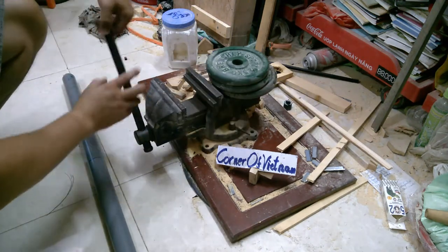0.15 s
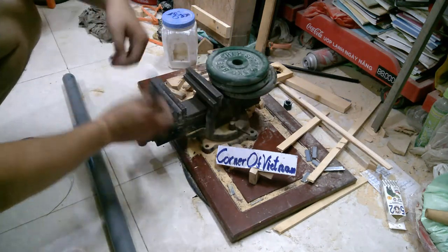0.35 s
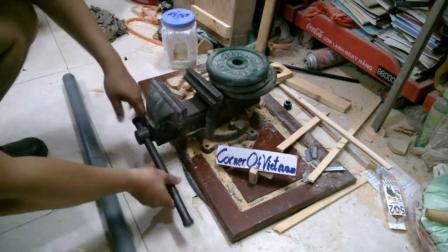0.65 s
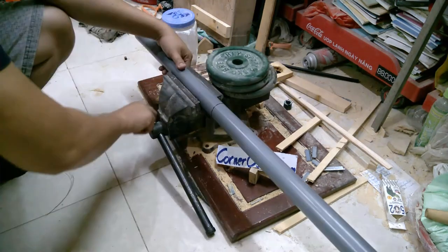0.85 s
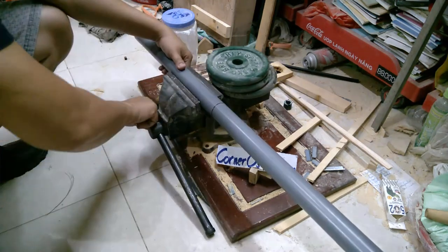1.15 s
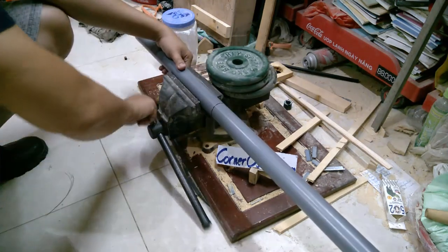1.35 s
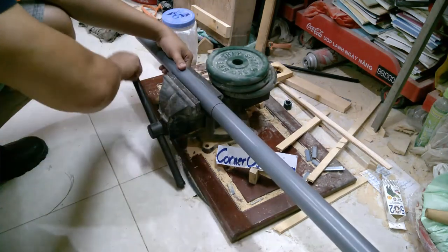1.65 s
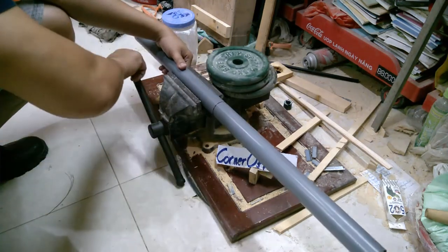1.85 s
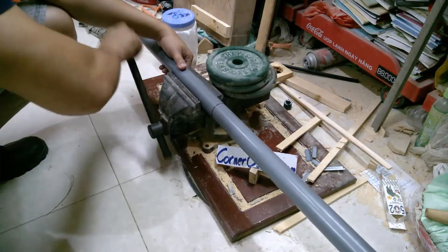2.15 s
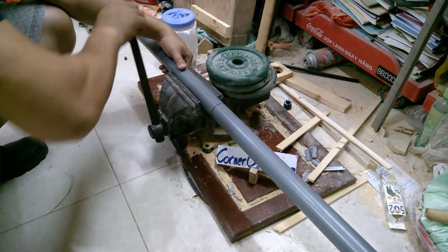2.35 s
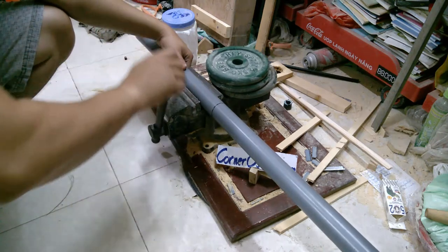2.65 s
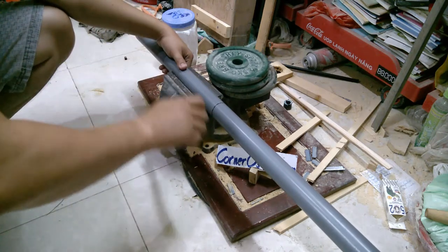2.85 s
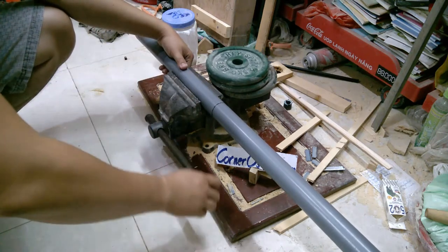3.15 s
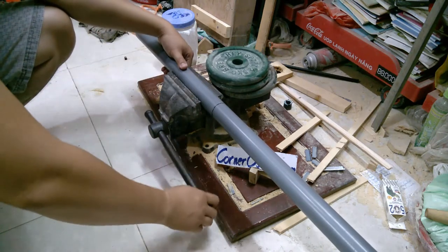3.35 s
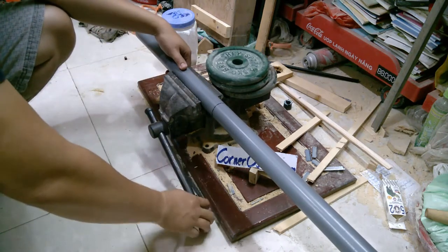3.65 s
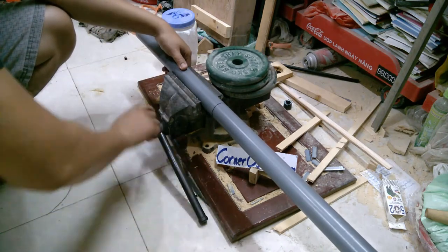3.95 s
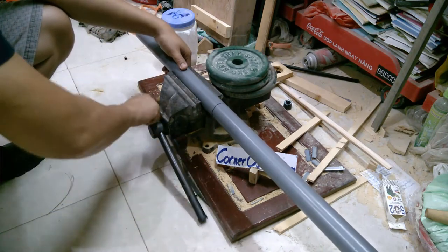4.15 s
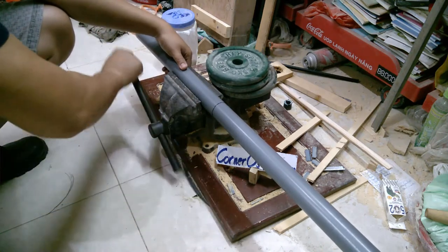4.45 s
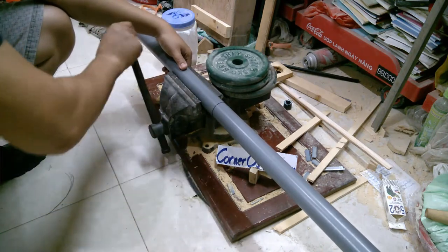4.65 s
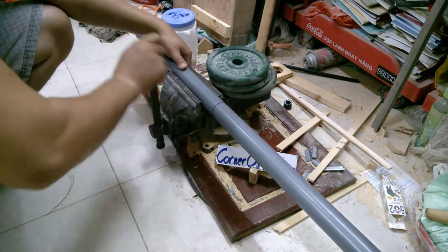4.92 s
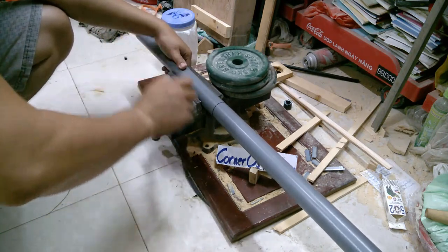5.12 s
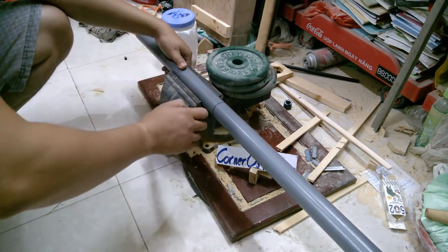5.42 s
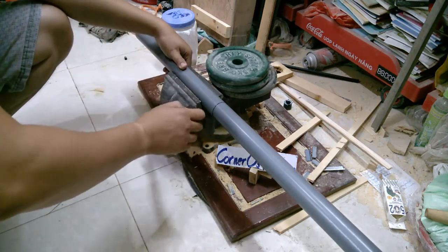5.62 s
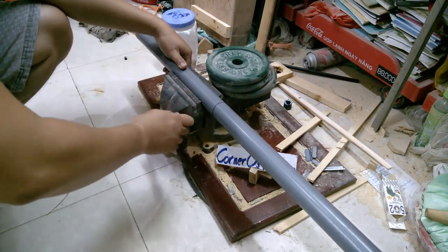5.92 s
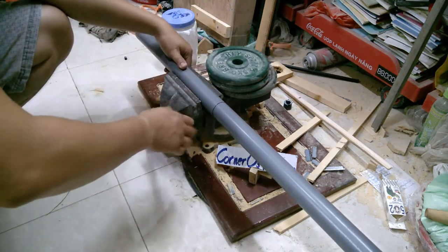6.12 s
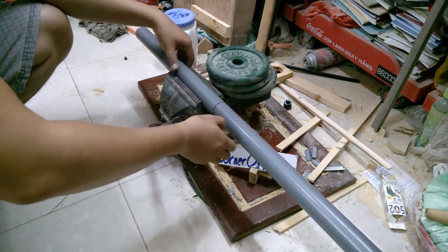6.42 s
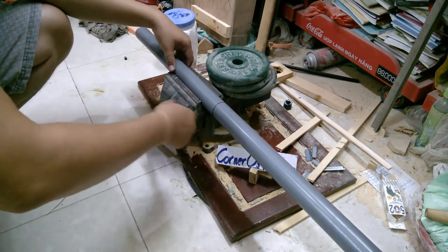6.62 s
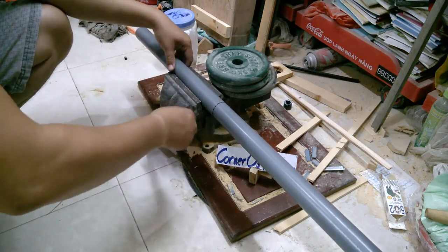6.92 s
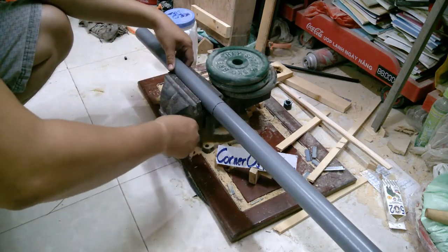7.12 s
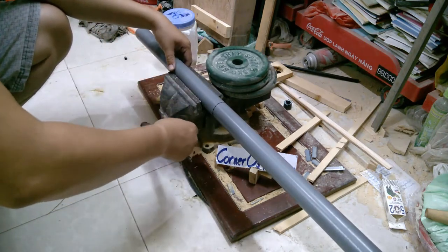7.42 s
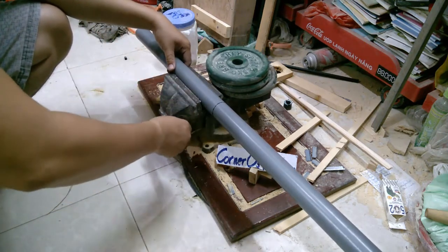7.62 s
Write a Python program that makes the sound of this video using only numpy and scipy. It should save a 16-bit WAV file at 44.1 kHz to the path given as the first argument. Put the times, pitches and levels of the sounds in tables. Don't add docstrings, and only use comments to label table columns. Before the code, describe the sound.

A hand cranks a cast-iron bench vise onto a plastic pipe. Dull knocks come first, then a loud cluster of bouncing, ringing steel handle clanks around two seconds, another heavy ringing pair at three and a half, the hardest blow near six, and a last bright clank near the end. Between them the screw scrapes, rattles and squeaks. Close microphone in a small reverberant tiled workshop, low fan hum and street rumble.

```python
import sys
import numpy as np
from scipy import signal
from scipy.fft import rfft, irfft
from scipy.io import wavfile
from scipy.ndimage import uniform_filter1d

SR = 44100
rng = np.random.default_rng(int(sys.argv[2]) if len(sys.argv) > 2 else 0)


def unload_audio(sound):
    columns = np.transpose(np.atleast_2d(sound))
    steps = np.round(np.clip(columns, -1, 1) * 32767)
    wavfile.write(sys.argv[1], SR, steps.astype(np.int16))


def decibels_to_gain(level_db):
    exponent = np.asarray(level_db, float) / 20
    return 10 ** exponent


N = 343084


def evened(x):
    return x / np.sqrt(np.mean(x ** 2) + 1e-20)


def read(points, hz):
    f, value = np.transpose(points)
    return np.interp(np.log(hz + 1), np.log(f + 1), value)


def add(mix, s, sound):
    part = mix[round(s * SR):][:len(sound)]
    part += sound[:len(part)]


def band(x, lo_hz, hi_hz):
    sos = signal.butter(4, [lo_hz, min(hi_hz, SR / 2.2)], "bandpass", fs=SR, output="sos")
    return evened(signal.sosfilt(sos, x))


def resonate(x, hz, width_hz):
    turn = np.exp(2j * np.pi * np.cumsum(hz * np.ones(len(x))) / SR)
    r = np.exp(-np.pi * width_hz / SR)
    return 2 * (turn * signal.lfilter([1 - r], [1, -r], x * turn.conj())).real


def ring(modes, t):
    hz, db, t60_s = np.transpose(modes)[..., None]
    phase = 2 * rng.standard_normal((len(modes), 1))
    return (decibels_to_gain(db - 60 * t / t60_s) * np.sin(2 * np.pi * hz * t + phase)).sum(0)


def unfold(rows):
    s, *columns = np.transpose(rows)
    t = np.arange(s[0], s[-1], 1 / SR)
    return s[0], signal.windows.tukey(len(t), .08), [np.interp(t, s, c) for c in columns]


def coloured(spectrum, patchy_db, swell_db):
    frames, hz = N // 256 + 5, np.fft.rfftfreq(1024, 1 / SR)
    a, b, patches = rng.standard_normal((frames, len(hz), 3)).T
    patches = uniform_filter1d(patches, size=10, axis=0)
    patches = evened(uniform_filter1d(patches, size=14, axis=1))
    swell = evened(uniform_filter1d(rng.standard_normal(frames), size=40))
    level_db = patchy_db * patches + swell_db * swell
    z = (a + 1j * b) * decibels_to_gain(read(spectrum, hz)[:, None] + level_db)
    return evened(signal.istft(z, nperseg=1024, noverlap=768)[1][:N])


# frequency in Hz, width in Hz, level in dB.
FAN = [(54, 12, -54), (82.64, 2.6, -52), (142.2, 5.3, -60.5), (184.5, 10, -62), (409.2, 17, -64),
       (490.4, 4.3, -68.5), (1906, 20, -81.5)]
# frequency in Hz, density in dB per Hz.
STREET = [(12, -49.5), (20, -12.5), (91, -2), (107, -14), (136, -14), (271, -11), (416, -18.5),
          (450, -31.5), (580, -69.5), (990, -120)]
# frequency in Hz, density in dB per Hz.
AIR = [(300, -29), (450, -4), (600, -4.5), (800, -6.5), (1200, -10), (2000, -17.5), (3000, -19.5),
       (4500, -19.5), (5600, -23.5), (6500, -31), (8000, -40), (11000, -40.5), (13000, -37), (15500, -42.5)]
STREET_DB, AIR_DB = -54.5, -62.5


def air():
    noise = rng.standard_normal(N)
    lines = np.zeros(N)
    for hz, width_hz, db in FAN:
        lines += decibels_to_gain(db) * evened(resonate(resonate(noise, hz, 1.5 * width_hz), hz, 3 * width_hz))
    rumble = decibels_to_gain(STREET_DB) * coloured(STREET, patchy_db=0.3, swell_db=0.79)
    hiss = decibels_to_gain(AIR_DB) * coloured(AIR, patchy_db=2., swell_db=1.34)
    return rumble + hiss + lines


# start in seconds, level in dB, frequency in Hz,
# t60 in seconds.
NOTES = [(0.058, -32.5, 1720, 0.024), (0.062, -33.5, 1000, 0.026), (0.014, -40.5, 1700, 0.027),
         (0.059, -29, 3325, 0.016), (1.896, -20.5, 740, 0.0387), (1.9, -27, 3034, 0.06),
         (2.23, -22.5, 454, 0.048), (7.326, -43, 3447, 0.044), (3.62, -26.5, 172, 0.032),
         (3.641, -28, 160, 0.046), (.281, -46, 3353, 0.092), (.281, -34, 796, 0.038),
         (1.394, -42.5, 3177, 0.08), (1.391, -39, 5935, 0.036), (1.394, -35, 5207, .03),
         (1.392, -38.5, 1172, 0.104), (2.2065, -11, 1130, 0.025), (3.59, -28, 799, 0.162),
         (3.578, -21, 210, 0.05), (3.581, -17, 127.6, 0.05), (3.59, -29.5, 3009, 0.096),
         (4.226, -27.5, 1163, 0.062), (5.78, -42.5, 377.6, .1), (5.7785, -15, 2500, 0.01),
         (5.7785, -17.5, 1295, 0.021), (5.7785, -11, 1900, .02), (5.756, -47, 5200, .03),
         (5.755, -41, 1080, .04), (1.69, -40, 1150, 0.054), (5.876, -30, 1190, 0.027),
         (7.526, -22, 1790, .05), (7.527, -18.5, 4910, 0.027), (7.524, -28, 2950, .05),
         (1.946, -22.5, 1110, .03), (7.326, -45, 5100, .03), (7.326, -47, 6000, 0.028),
         (5.778, -26.5, 2700, 0.013), (7.163, -41, 1210, 0.15), (7.163, -41.5, 687, 0.077),
         (7.164, -38.5, 466, 0.062), (7.327, -35, 545, 0.041), (7.524, -19, 2190, 0.11)]


def note(db, hz, t60_s):
    t = np.arange(SR // 4) / SR
    return ring([(hz, db, t60_s)], t) * (1 - np.exp(-t * hz / 0.28))


def causal(spectrum):
    log_gain = np.log(decibels_to_gain(read(spectrum, abs(np.fft.fftfreq(4096, 1 / SR)))))
    return np.fft.ifft(np.exp(log_gain - 1j * signal.hilbert(log_gain).imag)).real[:2048]


def chatter(t60_s, seat_s):
    shape = decibels_to_gain(-60 * np.arange(1024) / SR / t60_s)
    burst = rng.standard_normal(len(shape))
    for _ in range(6):
        z = rfft(burst * shape)
        burst = irfft(z / abs(z)) / np.sqrt(shape)
    return burst * np.sqrt(shape) * np.minimum(np.arange(len(shape)) / SR / seat_s, 1)


# start in seconds, blow in dB, blow pitch in Hz,
# thud in dB above the blow, hardness in dB above the blow.
KNOCKS = [(0.015, -28.5, 907, -23, -7), (0.056, -20.5, 870, -19, -3), (0.2745, -38, 805, -16, 4),
          (0.281, -22.5, 814, -19.5, -7.5), (0.599, -59.5, 1210, 7.5, 15), (0.794, -59, 670.6, 16.5, -8),
          (.957, -43, 1500, -3, -17), (1.388, -30, 1070, -14, 10.5), (1.395, -25.5, 1180, -15.5, 7.5),
          (1.4, -19.5, 753, -30, -15), (1.643, -28.5, 763, 1.5, -6), (1.69, -18.5, 744, -16.5, -9),
          (1.877, -29, 910, -12, -20), (2.197, -36, 1150, -20.5, 2), (2.2017, -24, 1100, -25.5, -8.5),
          (4.145, -33, 1036, -14.5, -5), (4.2245, -19.5, 1100, -19, -6), (4.633, -37, 800, -12, -18),
          (5.031, -55, 974.6, -9, -2), (5.755, -22.5, 1070, -12, -3.5), (7.1628, -29, 1210, -11.5, -1.5),
          (7.326, -28, 1230, -16, 3)]
# start in seconds, blow in dB, blow pitch in Hz,
# thud in dB above the blow, hardness in dB above the blow.
CLANKS = [(1.8945, -12, 710, -21, 1.5), (1.9, -16, 1900, -21, -1), (1.912, -8.5, 1160, -24.5, -15.5),
          (1.931, -19, 1650, -17, -2), (1.924, -17, 900, -20, -1), (1.945, -15, 1200, -18.5, -2.5),
          (1.951, -16, 1760, -16.5, 4), (2.2056, -19.5, 1140, -14.5, 0.5), (2.2244, -11.5, 1300, -26.5, 2),
          (2.231, -12, 1210, -25.5, 3.5), (2.2387, -15, 1003, -27, 1.5), (2.2548, -13.5, 2100, -30, 4.5),
          (2.274, -19, 1100, -19.5, 1), (3.577, -9.5, 1660, -7, 3), (3.591, -21, 825, -18.5, 10.5),
          (3.618, -8.5, 1600, -19.5, 3.5), (3.639, -18, 1290, -16.5, -2), (3.713, -32, 1520, -16, 7),
          (5.778, -2, 1380, -15.5, -7.5), (5.792, -14.5, 2100, -20, -8), (5.814, -17, 1900, -20, -8),
          (5.8765, -24, 1300, -14, -4), (7.523, -8.5, 1300, -20.5, 0), (7.527, -10, 1830, -11.5, 8),
          (7.539, -14, 1985, -32, -5), (7.551, -16, 1200, -22, 1), (7.572, -17.5, 2100, -23, 3)]
# frequency in Hz, width in Hz, level in dB above the blow.
CASTING = [(418, 90, 0.5), (780, 100, -0.5), (1233, 180, -1.5), (1720, 230, -0.5), (2222, 170, -0.5),
           (2730, 270, -2), (3180, 230, 0), (4400, 300, -5)]
SOFT_SEAT_S, SEAT_S = 0.0025, .001
CASTING_SPREAD_DB = 2.
CONTACT_DB = -6


def knock(db, hz, thud_db, hardness_db, seat_s):
    clack_db, tick_db = hardness_db - 3.5, hardness_db - 25.5
    colour = [(60, thud_db + 8), (170, thud_db + 18), (430, thud_db + 15),
              (650, -3), (0.54 * hz, -2.5), (hz, 3), (1.62 * hz, -2.5),
              (2300, clack_db), (4300, clack_db - 2), (5300, (clack_db + tick_db) / 2 + 5.5),
              (6400, tick_db + 9.5), (10000, tick_db), (15500, tick_db - 1.5)]
    blow = decibels_to_gain(db + 22) * np.convolve(chatter(.045, seat_s), causal(colour))
    total = blow.copy()
    for mode_hz, width_hz, mode_db in CASTING:
        luck_db = CASTING_SPREAD_DB * rng.standard_normal()
        total += decibels_to_gain(mode_db + luck_db) * resonate(blow, mode_hz, width_hz)
    return decibels_to_gain(CONTACT_DB) * total


# start in seconds, first bend in dB, then pinched bend, second bend
# and high bends in dB above the first.
RINGS = [(0.0164, -65, 11, -17.5, -14), (0.0571, -49.5, 7.5, -27.5, -20), (0.2764, -43, -11, -17.5, -21),
         (0.5983, -66.5, -3.5, -4.5, -18), (0.7942, -66, -15, -32, -20), (1.2624, -61.5, -3, -30.5, -23),
         (1.388, -43, 13, -12, -10), (1.396, -42.5, 14.5, -8, -14), (3.5785, -14, -8, -30, -20.5),
         (3.591, -8, -16, -19, -21.5), (3.6185, -13.5, -14, -16.5, -26), (3.643, -27, -9.5, -1, -14),
         (3.707, -27, -14, -11, -21), (3.735, -32.5, -14, -11, -26), (4.1448, -50, 5, -24.5, -19),
         (4.2268, -50, 10, -31.5, -17.5), (5.7555, -62, 5, -20, -20), (5.7802, -42, -3, -1, -20),
         (5.9205, -48.5, -14.5, -12, -28), (7.1589, -64, 0, -23.5, -29.5),
         (7.3237, -64.5, -16.5, -34.5, -32), (7.5241, -21, -3, -10.5, -25), (7.5375, -22.5, -6, -10.5, -22),
         (7.552, -25.5, -10, -11, -21)]
# frequency in Hz, level in dB, t60 in seconds.
BENDS = [(4097, -14, .08), (4170, -12, .08), (4268, 0, .18), (4322, -6, .15)]
# frequency in Hz, level in dB, t60 in seconds.
PINCHED = [(4390, 6, 0.045), (4470, 10, .055), (4570, 2, .045)]
# frequency in Hz, level in dB, t60 in seconds.
SECOND = [(6905, 0, .17), (6965, -5, .12)]
# frequency in Hz, level in dB, t60 in seconds.
COLLAR = [(5180, 0, .14), (5260, -4, .09), (5873, -6, .15), (9150, -14, .1)]
# frequency in Hz, level in dB, t60 in seconds.
HIGH = [(8160, 0, .12), (8310, -6, .08), (10025, -6, .13), (10770, -12, .11), (11310, -10, .08),
        (12070, -7, .08)]
BUZZ_DB, BUZZ_S = 2.5, 0.0069
MUTE_S = .004


def handle(lasts_s, db, pinched_db, second_db, high_db, collar_db=-20):
    t = np.arange(SR // 3) / SR
    groups = [(BENDS, 0), (PINCHED, pinched_db - 9.5), (SECOND, second_db + 0.5),
              (COLLAR, collar_db - 0.5), (HIGH, high_db + 1.5)]
    bar = np.zeros(len(t))
    for modes, group_db in groups:
        buzz = evened(uniform_filter1d(rng.standard_normal(len(t)), round(BUZZ_S * SR)))
        bar += decibels_to_gain(group_db + BUZZ_DB * buzz) * ring(modes, t)
    onset = 1 - np.exp(-t / 0.0008)
    mute = np.exp(-np.maximum(t - lasts_s, 0) / MUTE_S)
    return decibels_to_gain(db - 4) * bar * onset * mute


# frequency in Hz, t60 in seconds.
ROOM = [(60, 0.62), (250, 0.41), (1000, 0.45), (3000, 0.44), (8000, 0.4), (15000, 0.452)]
# delay in seconds, level in dB.
ECHOES = [(.0036, -10), (.0071, -11), (.0131, -11), (.0172, -13), (.0245, -12), (.036, -13)]


def room():
    taps = np.zeros(SR)
    at = np.arange(150, SR - 20, 12)
    taps[at + rng.integers(0, 12, len(at))] = rng.choice([-1., 1.], len(at))
    taps *= 1 - np.exp(-np.arange(SR) / SR / 0.0065)
    hz, t, z = signal.stft(taps, SR, nperseg=256)
    tail = signal.istft(z * decibels_to_gain(-60 * t / read(ROOM, hz)[:, None]), SR, nperseg=256)[1]
    tail *= decibels_to_gain(0.47) / np.linalg.norm(tail)
    for k, (s, db) in enumerate(ECHOES):
        tail[round(s * SR)] += (-1) ** k * decibels_to_gain(db)
    tail[0] += 1
    return tail


def thread(start, end, first_db, last_db):
    _, fade, (force_db,) = unfold([(start, first_db), (end, last_db)])
    sizes = decibels_to_gain(4.5 * np.minimum(rng.exponential(1, len(fade)), 3))
    slipping = rng.random(len(fade)) < 2500 / SR
    return rng.standard_normal(len(fade)) * sizes * slipping, decibels_to_gain(force_db) * fade


# start in seconds,
# end in seconds, first level in dB, last level in dB, brightness in dB.
SCRAPES = [(0.607, 0.667, -80, -50, 2.5), (.662, 0.795, -55.5, -51.5, -7), (1.241, 1.37, -70, -45, -7),
           (1.45, 1.635, -53.5, -65, -13.5), (1.715, 1.793, -37, -87.5, -25.5),
           (2.099, 2.165, -57.5, -39, 2), (2.155, 2.222, -48.5, -29.5, 2.5),
           (4.157, 4.214, -47.5, -48.5, -4), (4.28, 4.397, -51, -72, 2), (4.396, 4.639, -64, -76, 0),
           (5.659, 5.76, -65.5, -45, -5), (7.204, 7.3, -55, -70.5, -5), (7.36, 7.475, -52, -81, 6),
           (7.478, 7.522, -59, -51.5, -7)]
# frequency in Hz, width in Hz, level in dB.
BODY = [(716, 180, 5), (996, 73, 10), (1210, 71, 7.5), (1620, 270, 0.5), (1739, 140, -12), (2085, 27, -19)]


def scrape(start, end, first_db, last_db, bright_db):
    slips, level = thread(start, end, first_db, last_db)
    body = sum(decibels_to_gain(db) * resonate(slips, hz, width_hz) for hz, width_hz, db in BODY)
    bright = decibels_to_gain(bright_db - 9.5) * band(slips, 2800, 5600)
    return start, decibels_to_gain(-3.5) * level * (band(body, 400, 3067) + bright)


# start in seconds, end in seconds,
# first level in dB, last level in dB, pitch in Hz.
RATTLES = [
    (0.607, 0.794, -70, -70.5, 4700),
    (1.239, 1.379, -65, -50, 4380),
    (1.449, 1.63, -60, -70, 4560),
    (2.101, 2.21, -59, -33.5, 4480),
    (4.147, 4.222, -44.5, -55, 4470),
    (4.274, 4.397, -53, -61, 4800),
    (4.392, 4.629, -63, -68, 4835),
    (5.662, 5.748, -82.5, -65.5, 4500),
]
RATTLE_SECOND_DB = -14.5
SLACKEN_HZ = 150


def rattle(start, end, first_db, last_db, rattle_hz):
    slips, level = thread(start, end, first_db, last_db)
    width_hz = 70 + 1.3 * max(rattle_hz - 4400, 0)
    glide = np.linspace(.5, -.5, len(slips)) * np.sign(first_db - last_db)
    hz = rattle_hz + SLACKEN_HZ * glide
    first = evened(resonate(resonate(slips, hz, width_hz), hz, width_hz))
    upper = resonate(slips, 6930 + .5 * (rattle_hz - 4300), .7 * width_hz)
    upper = upper + decibels_to_gain(-11) * resonate(slips, 8290, 60)
    second = band(upper, 6600, 8600) + decibels_to_gain(-2.5) * band(slips, 5600, 15000)
    return start, decibels_to_gain(-10.5) * level * (first + decibels_to_gain(RATTLE_SECOND_DB) * second)


# time in seconds, frequency in Hz, level in dB.
SQUEAL = [
    [(1.47, 3970, -68.5), (1.52, 3890, -64), (1.6, 3855, -70), (1.64, 4070, -76)],
    [(4.46, 3484, -77.5), (4.52, 3388, -69), (4.57, 2895, -73), (4.62, 2857, -78)],
    [(6.15, 3380, -68), (6.175, 3682, -62), (6.205, 3640, -57), (6.225, 3700, -69.5), (6.25, 3678, -62),
     (6.33, 3678, -68), (6.345, 3700, -80)],
    [(2.36, 570, -58), (2.395, 560, -45), (2.43, 550, -50), (2.47, 550, -62)],
]


def squeal(rows):
    s, fade, (hz, db) = unfold(rows)
    turns = 2 * np.pi * np.cumsum(hz) / SR
    return s, decibels_to_gain(db - 1.5) * fade * (np.sin(turns) + decibels_to_gain(-25) * np.sin(2.04 * turns))


# start in seconds, length in seconds, level in dB,
# first pitch in Hz, turning pitch in Hz.
SQUEAKS = [
    (4.464, 0.144, -72, 3700, 2955),
    (5.926, 0.178, -55, 2625, 3180),
    (6.141, 0.09, -58.5, 3240, 3300),
    (6.33, 0.252, -59, 2750, 3250),
    (5.68, 0.093, -55, 2850, 2850),
    (5.7, .055, -60, 2000, 2000),
    (5.68, .075, -55, 1000, 1020),
]
# start in seconds, length in seconds, level in dB,
# first pitch in Hz, turning pitch in Hz.
ARCHED = (1.64, 0.235, -54, 3200, 3560)
SQUEAK_RISE_S, SQUEAK_SAG_DB, SQUEAK_WIDTH_HZ = .04, -12, 560


def squeak(start, length_s, db, first_hz, turning_hz, arch=.65):
    s, fade, (part,) = unfold([(start, 0), (start + length_s, 1)])
    hz = first_hz + (turning_hz - first_hz) * np.sin(np.pi * arch * part)
    core = resonate(rng.standard_normal(len(fade)), hz, SQUEAK_WIDTH_HZ)
    core = evened(resonate(core, hz, SQUEAK_WIDTH_HZ))
    onset = np.minimum(part * length_s / SQUEAK_RISE_S, 1)
    return s, decibels_to_gain(db - 4.5 + SQUEAK_SAG_DB * part ** 2) * onset * fade * core


# start in seconds, first bend in dB, then pinched bend,
# second bend and high bends in dB above the first.
LOOSE = [(1.879, -48, 3.5, -25, -25), (1.895, -29, 0, -30, -19), (1.9105, -17.5, -5, -25.5, -28),
         (1.9233, -21.5, -10.5, -26, -28), (1.9315, -23.5, -10, -13, -29.5), (1.958, -27.5, -8, -17, -25.5),
         (2.146, -51.5, -16.5, -29, -11), (2.2055, -24.5, -2.5, -25, -19),
         (2.2235, -23, -5.5, -23.5, -22.5), (2.2315, -19.5, -10.5, -19, -22.5), (2.2558, -20, -5, -16, -22),
         (2.272, -19.5, -11, -16.5, -24)]


def loose_handle(*row):
    return handle(*row, collar_db=-5)


# loudest moment in seconds, level in dB,
# rise in seconds, fall in seconds.
RUBS = [
    (2.81, -50.5, 0.0475, 0.19),
    (4.81, -77, 0.0282, .15),
    (5.004, -74, .02, 0.2215),
    (5.3, -64.5, 0.073, 0.133),
    (5.5, -71.5, 0.078, 0.11),
    (6.95, -74, 0.51, 0.78),
]
# frequency in Hz, density in dB per Hz.
RUB = [(470, -48), (800, -18), (1570, 1.5), (1860, -4), (3080, -2.5), (3320, -6.5), (5350, -4),
       (6840, -23.5), (15000, -34)]
RUB_EDGE_DB = -31


def palm():
    level = np.zeros(N)
    for top_s, top_db, rise_s, fall_s in RUBS:
        s, fade, (db,) = unfold([(top_s - rise_s, RUB_EDGE_DB), (top_s, 0), (top_s + fall_s, RUB_EDGE_DB)])
        add(level, s, decibels_to_gain(top_db + db) * fade)
    return level * coloured(RUB, patchy_db=3.5, swell_db=3.0)


# start in seconds, level in dB, frequency in Hz, t60 in seconds.
THUMPS = [
    (3.58, -26, 54.2, 0.7),
    (5.775, -34, 48.3, 0.64),
    (7.524, -39, 72.4, 0.97),
]


def thump(db, hz, t60_s):
    t = np.arange(SR // 2) / SR
    return ring([(hz, db - 2.5, t60_s)], t) * (1 - np.exp(-t / 0.017))


RING_ROOM_DB, NOTE_ROOM_DB = -10, -6
CHANGE_S = .793


def scene():
    spots, direct = np.zeros((3, N)), air()

    def add_facing(spot, s, sound, room_db):
        add(spot, s, decibels_to_gain(room_db) * sound)
        add(direct, s, (1 - decibels_to_gain(room_db)) * sound)

    for s, *row in NOTES:
        add_facing(spots[0], s, note(*row), NOTE_ROOM_DB)
    for seat_s, events in ((SOFT_SEAT_S, KNOCKS), (SEAT_S, CLANKS)):
        for k, (s, *row) in enumerate(events):
            add(spots[k % 3], s, knock(*row, seat_s))
    for source, events in ((handle, RINGS), (loose_handle, LOOSE)):
        gaps_s = np.diff(np.array(events)[:, 0], append=N)
        for k, (s, *row) in enumerate(events):
            add_facing(spots[k % 3], s, source(gaps_s[k], *row), RING_ROOM_DB)
    for source, events in ((scrape, SCRAPES), (rattle, RATTLES), (squeak, SQUEAKS)):
        for row in events:
            add(spots[1], *source(*row))
    for rows in SQUEAL:
        add(spots[2], *squeal(rows))
    add(spots[1], *squeak(*ARCHED, arch=1.1))
    spots[0] += palm()
    for s, *row in THUMPS:
        add(direct, s, thump(*row))

    mix, cut = direct, round(CHANGE_S * SR)
    for spot in spots:
        walls = room()
        parts = [signal.fftconvolve(part, walls)[:len(part)] for part in (spot[:cut], spot[cut:])]
        mix = mix + decibels_to_gain(1.5) * np.concatenate(parts)
    return mix[None]


def low_pass(x):
    return signal.sosfilt(signal.butter(12, 16680, fs=SR, output="sos"), x)


HISS_DB, EDGE_HZ = -78.5, 15800


def record(dry):
    hissy = dry + decibels_to_gain(HISS_DB) * rng.standard_normal(dry.shape)
    lowpass = signal.firwin(255, EDGE_HZ, window=("kaiser", 8), fs=SR)
    return low_pass(signal.oaconvolve(hissy, lowpass[None], "same"))


dry = scene()
out = record(dry)
unload_audio(out)
```